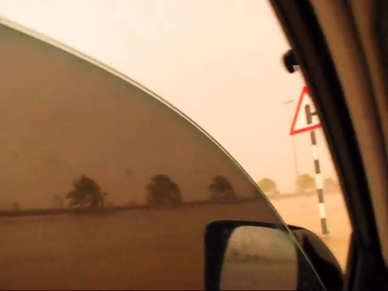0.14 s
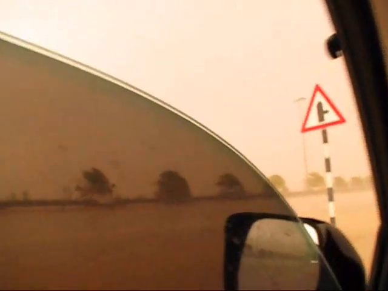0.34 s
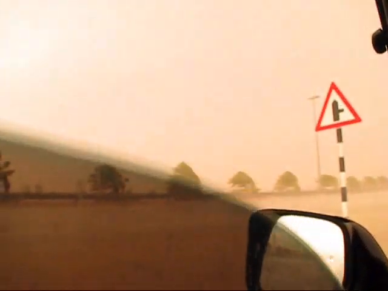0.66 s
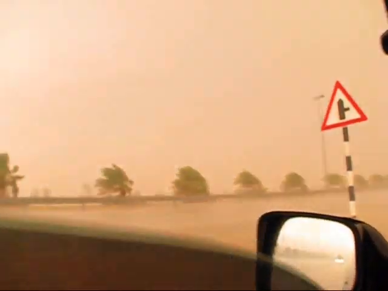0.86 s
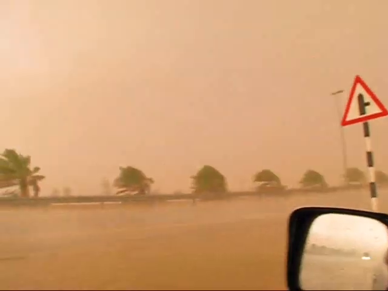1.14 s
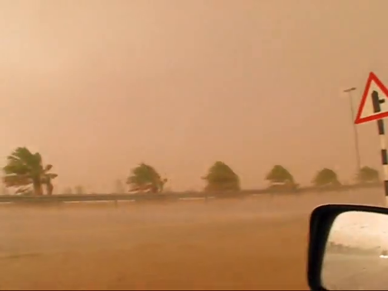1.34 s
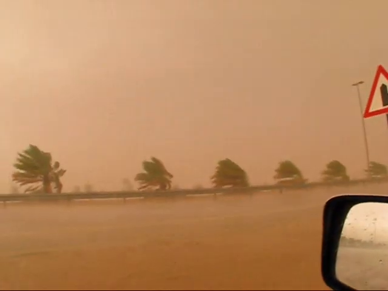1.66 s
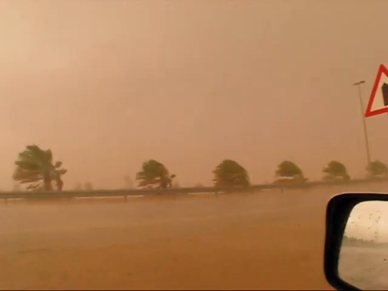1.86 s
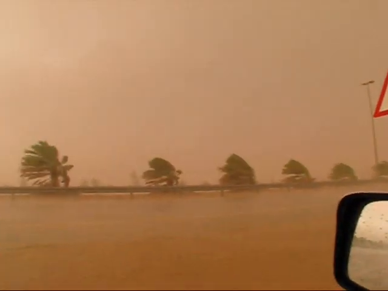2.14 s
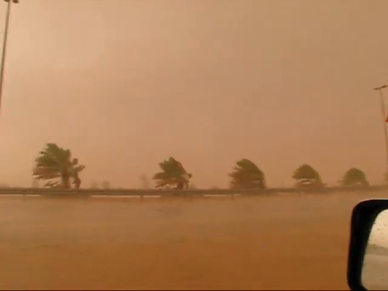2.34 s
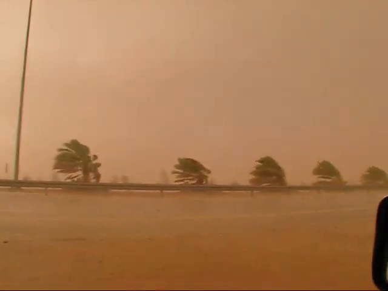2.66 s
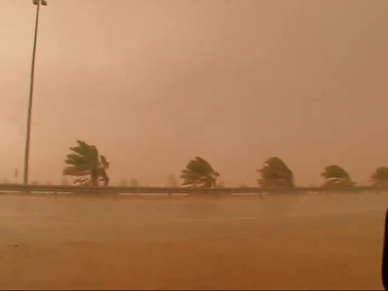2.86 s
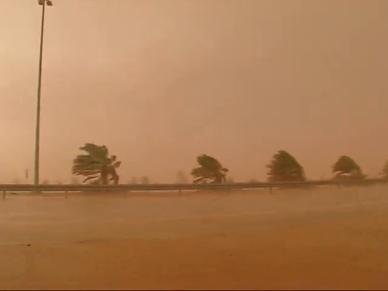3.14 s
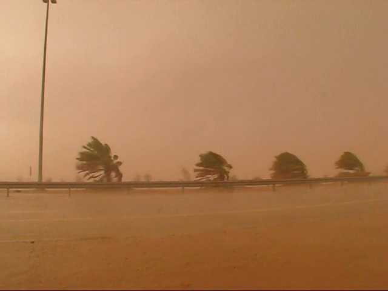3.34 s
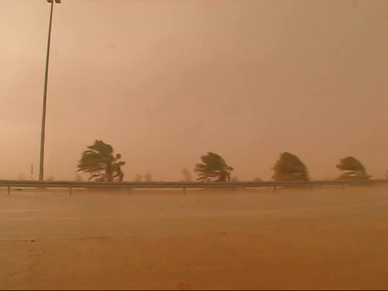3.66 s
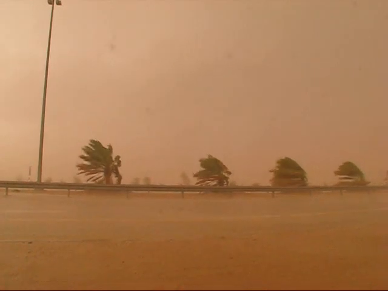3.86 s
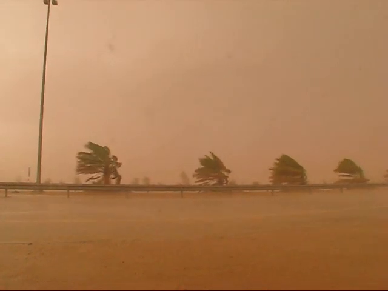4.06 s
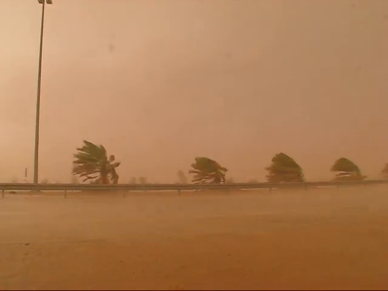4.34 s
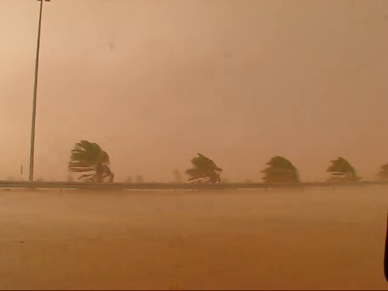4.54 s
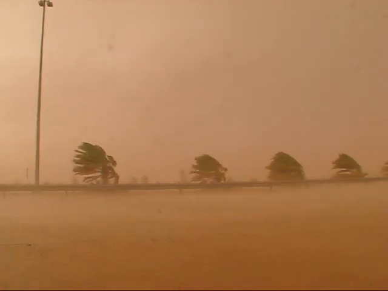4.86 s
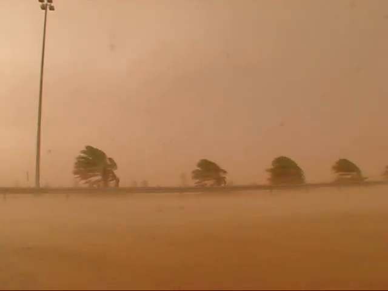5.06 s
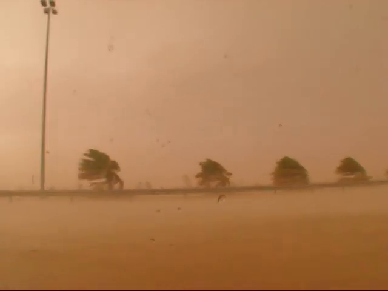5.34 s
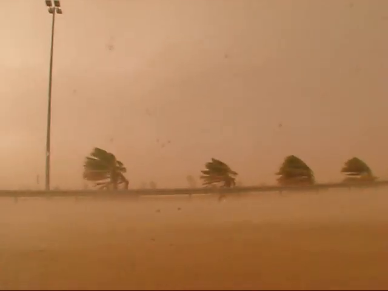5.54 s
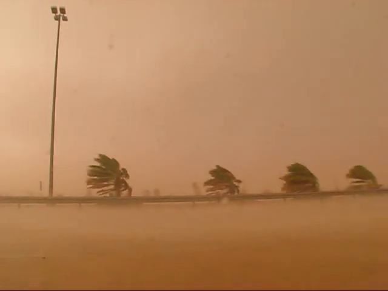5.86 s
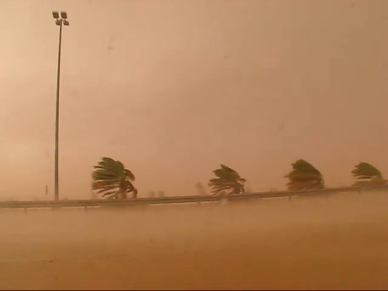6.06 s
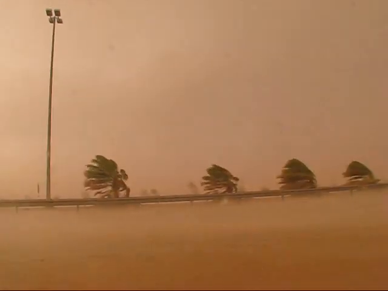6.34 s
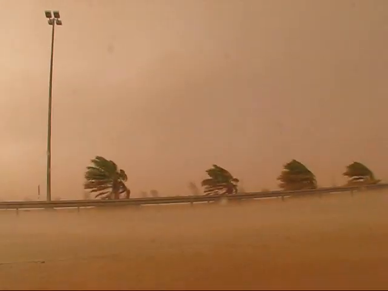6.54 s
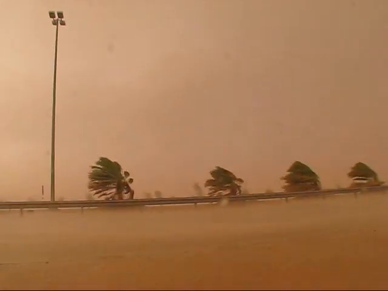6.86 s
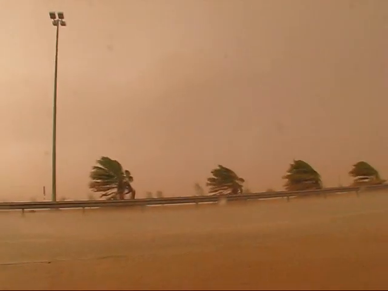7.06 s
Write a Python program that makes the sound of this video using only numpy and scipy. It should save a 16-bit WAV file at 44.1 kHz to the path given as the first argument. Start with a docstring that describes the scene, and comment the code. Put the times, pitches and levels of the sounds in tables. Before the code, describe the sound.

A gale roars and heavy rain rushes across a desert road, heard from a stereo microphone at a car's side window. Slightly muffled at first, the storm grows louder and brighter as the window opens. Gusts thump, knock and crack on the microphone, mostly on the left, over a low cabin rumble and occasional ticking drops. After the hardest blows the storm dips and swells back, then eases toward the end.

```python
"""A desert road in a storm of rain and sand, from a camera's stereo microphone at a car's open side window.
Outside, the gale roars, sheets of rain rush past and spray hisses, brighter once the glass has sunk.
The window edge whistles and the draught shakes the cabin. Up close, single drops tick and eddies thump,
knock and crack on the microphone ports. Each hard thump makes the gain control duck,
so the storm sinks at once and then swells back."""
import sys
import numpy as np
from scipy import signal
from scipy.fft import rfft, irfft, next_fast_len
from scipy.io import wavfile
from scipy.ndimage import uniform_filter1d, minimum_filter1d, map_coordinates

SR = 44100
rng = np.random.default_rng(int(sys.argv[2]) if len(sys.argv) > 2 else 0)


def materialize(psi):
    """Save the field psi as 16-bit PCM at rate SR to the path in sys.argv[1].

    A 1-D psi becomes a single channel; in a 2-D psi each row is a channel.
    """
    bounded = np.clip(np.atleast_2d(psi).T, -1, 1)
    quanta = np.round(bounded * 32767).astype(np.int16)
    wavfile.write(sys.argv[1], SR, quanta)


N = 317520
TIME = np.arange(N) / SR

# Spectral shapes at the microphone: frequency_hz, relative_db
GALE_SPECTRUM = [(15, -35), (25, -7), (115, -5.5), (158, -2), (264, -3), (318, -4.5), (383, -3),
                 (879, -6.5), (1090, -6), (1240, -7), (1500, -5), (2560, -6), (4380, -8.5), (9000, -15),
                 (12800, -17), (15000, -37.5)]  # wind, rain and spray outside
SHEET_SPECTRUM = [(200, -31), (600, 13), (2000, 10), (3500, 8), (7000, -13), (14000, -33)]  # one passing sheet of rain
RUMBLE_SPECTRUM = [(10, -22), (27, 3), (45, -2), (70, -10), (110, -18), (600, -34), (2000, -65)]  # the shaking cabin
SPLASH_SPECTRUM = [(300, -18), (2500, -1), (6000, -1), (11000, -0.5), (13000, 0), (15000, -26)]  # a drop close by
EDDY_SPECTRUM = [(20, -25), (70, 2), (170, 2.5), (450, -2), (800, -7.5), (1400, -21), (3000, -27.5),
                 (7000, -48), (14000, -67)]  # pressure on a port
CRACKLE_SPECTRUM = [(200, -2), (900, 10), (2000, -1), (5000, -8), (12000, -71)]  # an eddy's crest tearing
CRACK_SPECTRUM = [(300, -16), (1000, 1), (2500, -2.5), (6000, -13), (9000, -28), (14000, -44)]  # flow breaking from a port
# How alike left and right sound: near mono in the bass, wide in the mids,
STEREO_LIKENESS = [(60, .99), (160, .98), (330, .96), (700, .88), (1160, .72), (1800, .48), (2700, .12),
                   (3700, .14), (4400, .8), (8000, .79), (14000, .83)]
# Which way the sound leans: frequency_hz, left_minus_right_db
STEREO_LEAN = [(60, 3.5), (110, 1.5), (200, 0.5), (380, 0.5), (690, 0), (1280, 0.5), (2360, -2.5),
               (4340, -0.5), (8010, 0.5), (14800, -0.5)]
# Strength of the storm, as the level of its rushing rain: time_s, level_db
STORM_STRENGTH = [(0, -25), (.45, -26), (.7, -24), (1.0, -22), (1.25, -18.5), (1.55, -20.5), (1.7, -18.5),
                  (2.2, -20.5), (2.6, -19.5), (2.9, -19), (3.1, -23.5), (3.35, -22), (3.65, -22),
                  (4.0, -22.5), (4.35, -22), (4.65, -20), (4.85, -19), (5.25, -23), (5.7, -25), (6.0, -26),
                  (6.3, -26.5), (6.55, -28), (6.7, -26.8), (6.85, -27.6), (7.2, -28)]
# Dull thuds in the car body: centre_s, length_s, level_db
BODY_THUDS = [(0.057, 0.09, -30), (0.22, 0.091, -30)]
# Gusts passing the window frame: centre_s, length_s, pitch_hz, glide_octaves_per_s, level_db
FRAME_GUSTS = [(0.4, 0.2, 678, 0, -31), (5.826, 0.1, 2026, -5.5, -28), (6.879, 0.4, 1190, 0.4, -35.5),
               (7.14, 0.24, 2084, 1, -38)]
# Sheets of rain just outside the window: centre_s, length_s, rush_db, spray_db
RAIN_SHEETS = [(0.39, 0.15, -25, -58), (0.68, 0.27, -40, -38), (1.224, 0.18, -35, -25),
               (2.637, 0.38, -28, -32), (2.878, 0.093, -30, -30), (4.3, 0.4, -40, -29.5),
               (5.34, 0.32, -28.5, -31.5), (5.79, 0.13, -28, -29)]
# Drops landing beside the microphone: start_s, level_db
NEAR_DROPS = [(0.498, -34), (1.349, -17), (2.417, -16), (2.894, -17), (3.652, -17), (3.7195, -18),
              (4.109, -16), (4.733, -7), (5.473, -17), (5.511, -14), (6.549, -18), (6.97, -24)]
# Eddies tearing across the ports: centre_s, level_db
PORT_CRACKS = [(1.979, -7), (3.015, -11.5), (4.973, -2), (4.98, -1), (4.9853, -0.5), (5.206, -16),
               (5.85, -14.5), (6.42, -11), (6.755, -16.5)]
# Eddies slamming a port: start_s, start_pitch_hz, level_db, left_minus_right_db
PORT_KNOCKS = [(1.757, 260, -3.5, 12), (1.828, 420, 6, 18), (1.9395, 330, 9, 15), (3.0125, 300, -2.5, 16),
               (3.829, 278, -2, 6), (3.836, 435, 2.5, 4), (4.6805, 640, 10, 16), (4.928, 500, 8.5, 16),
               (4.9503, 520, 5.5, 3), (4.973, 340, 9, 10), (4.9835, 420, 8, 6), (4.9922, 600, 7, -3),
               (5.6112, 220, 0.5, 20), (5.848, 369, 0, 10), (5.877, 280, -2, 17), (6.411, 280, 1, 19),
               (6.4195, 680, 3, 22), (6.448, 340, -1, -3), (6.7517, 357, -2.5, 9)]
# Eddies striking the ports: centre_s, length_s, peak_db, left_minus_right_db, extra_bass_db
PORT_EDDIES = [(0.613, 0.056, -14, 10, 5), (1.42, 0.064, -10, 4, 7), (1.76, 0.031, -2, 8, 9),
               (1.838, 0.029, 5, 12, 7), (1.885, 0.022, 8, 12, 6), (1.952, 0.032, 11.5, 8, 0),
               (1.977, 0.056, 14, 0.5, -2), (1.999, 0.028, 1, 10, 1), (2.038, 0.04, 3, -17, -5),
               (2.115, 0.025, -5.5, 14, 0), (2.182, 0.07, -14, 4, 12), (2.25, 0.062, -4, 12, 7),
               (2.39, 0.13, -10, 2.5, -1), (2.554, 0.056, -6, 7, 0), (2.901, 0.053, -8.5, 5, 2),
               (3.017, 0.035, -2.5, 12, 3), (3.221, 0.068, -10.5, 14, 3), (3.842, 0.054, 2.5, 0, 3),
               (3.916, 0.019, -4.5, -10, -5), (3.99, 0.027, -7, 14, -5), (4.108, 0.079, -9, 7, 9),
               (4.39, 0.048, -4, 23.5, 5), (4.558, 0.056, -17, 11, 8), (4.693, 0.018, 8.5, 0.5, -14),
               (4.743, 0.064, -6, 9, 7), (4.893, 0.018, -0.5, 7, 2), (4.933, 0.014, 8.5, 10, -2),
               (4.963, 0.016, 6, 4, 5), (4.981, 0.03, 10, 8, -6), (4.998, 0.014, 4, -11, -2),
               (5.201, 0.045, 1.5, 17, 2), (5.618, 0.016, -3.5, 20, 13), (5.636, 0.035, -8, 17, 3),
               (5.782, 0.018, -9, 1, 4), (5.85, 0.044, -1, 10, 0), (5.876, 0.018, -10, 12, 7.5),
               (5.981, 0.036, -11, 15, 21), (6.13, 0.13, -25, 11, 8), (6.269, 0.04, -8.5, 12, 6),
               (6.407, 0.029, -1, 18, 4), (6.437, 0.032, 0.5, 7, -9), (6.511, 0.047, -9.5, 8, -16),
               (6.732, 0.048, -7.5, 19, 16), (6.755, 0.029, -2, 18, 3), (6.844, 0.038, -10, 18, -2),
               (7.125, 0.09, -17.5, 4, 13)]

STORM_MEAN_DB, ROAR_DB, HISS_DB = -22, -25, -29  # rain, wind and spray at mean strength
ROAR_GROWTH, HISS_GROWTH = 0.67, 1  # dB gained per dB of storm strength
WINDOW_SINKS_S, WINDOW_DOWN_S = 0.17, 1
GLASS_ROAR_DB, GLASS_RUSH_DB, GLASS_HISS_DB = -3.5, -2.8, -4.5  # shielding by the raised glass
GLASS_EDGE_HZ = 5000  # the glass dulls the rush above this
KNOCK_RISE_S, KNOCK_T60_S = 0.00059, 0.04
KNOCK_SAG, KNOCK_SAG_S = 0.47, 0.012  # share of pitch lost as the eddy slows, and how soon


def amp(db):
    """Decibels to gain."""
    return 10 ** (np.asarray(db) / 20)


def unit(x):
    """x at rms 1."""
    return x / np.sqrt(np.mean(x ** 2) + 1e-20)


def unit_peak(pair):
    """Each channel at peak 1."""
    return pair / np.abs(pair).max(axis=1, keepdims=True)


def along(points, hz):
    """(Hz, value) points read on a log axis."""
    points_hz, values = np.transpose(points)
    return np.interp(np.log(hz + 1), np.log(points_hz + 1), values)


def bell(centre_s, length_s):
    """A smooth swell and fade of height 1."""
    return 1 / (1 + (2 * (TIME - centre_s) / length_s) ** 2) ** 2


def wobble(rate):
    """A smooth random curve, rate knots a second."""
    return map_coordinates(rng.standard_normal(int(N * rate / SR) + 4), [TIME * rate])


def below(x, edge, order=6):
    """A soft step from 1 under the edge to 0 above it."""
    return 1 / (1 + (x / edge) ** order)


def filtered(x, response):
    """x times a response of frequency."""
    size = next_fast_len(N + SR // 4)
    return irfft(rfft(x, size) * response(np.fft.rfftfreq(size, 1 / SR)), size)[..., :N]


def coloured(x, spectrum):
    """x shaped by (Hz, dB) points, at rms 1."""
    return unit(filtered(x, lambda hz: amp(along(spectrum, hz))))


def resonance(centre_hz, width_hz):
    """Noise of rms 1 ringing in one resonance."""
    return unit(filtered(rng.standard_normal(N), lambda hz: 1 / (1 + ((hz - centre_hz) / width_hz) ** 2)))


def turbulence(patchy_db):
    """Two noises whose loudness drifts in patches of time and frequency."""
    spectra = signal.stft(rng.standard_normal((2, N)), nperseg=512)[2]
    patches = uniform_filter1d(rng.standard_normal(spectra.shape[1:]), size=7, axis=0)
    patches = unit(uniform_filter1d(patches, size=14, axis=1))
    return unit(signal.istft(spectra * amp(patchy_db * patches), nperseg=512)[1][:, :N])


def patter(rate, spread_db):
    """Two streams of tiny impacts of varying size, rate a second."""
    hits = (rng.random((2, N)) < rate / SR) * rng.choice([-1, 1], (2, N))
    return unit(hits * amp(spread_db * rng.standard_normal((2, N)).clip(-2, 2)))


def stereo_band(pair, power_share):
    """One band of the gale's spectrum, spread over left and right."""
    def mid_side(hz):
        angle = np.arccos(np.clip(along(STEREO_LIKENESS, hz), -1, 1)) / 2
        return amp(along(GALE_SPECTRUM, hz)) * np.sqrt(power_share(hz)) * [np.cos(angle), np.sin(angle)]
    mid, side = filtered(pair, mid_side)
    left_right = np.array([mid + side, mid - side])
    return unit(filtered(left_right, lambda hz: amp(np.outer([.5, -.5], along(STEREO_LEAN, hz)))))


def port_shadow(lean_db):
    """Left and right gains: the port that an eddy meets second gets less."""
    return amp(np.minimum([[lean_db], [-lean_db]], 0))


def wakes(relative_db=-33.5, lag_s=0.02, length_s=0.27):
    """Strength of the churned air that trails the eddies."""
    return np.sqrt(sum((amp(peak_db + relative_db) * bell(centre_s + lag_s, length_s)) ** 2
                       for centre_s, _, peak_db, *_ in PORT_EDDIES))


def draught(steady_db=-39):
    """Strength of the air tumbling in: steady, and stronger in the wake of each eddy."""
    return np.hypot(amp(steady_db), wakes())


def cabin_boom(relative_db=-4.5):
    """The draught makes the cabin air boom hollowly around the microphone."""
    return draught() * amp(relative_db) * resonance(centre_hz=159.0, width_hz=26)


def rumble(relative_db=-5.5, flutter_db=2.0):
    """The draught shakes the whole cabin in slow lumps; the wakes flutter at each port on its own."""
    lumps = unit(amp(2.6 * wobble(14)) * coloured(rng.standard_normal(N), RUMBLE_SPECTRUM))
    flutter = amp(flutter_db * np.array([wobble(28), wobble(28)]).clip(-2, 1.7))
    flaps = unit(flutter * coloured(rng.standard_normal((2, N)), EDDY_SPECTRUM))
    return draught() * amp(relative_db) * lumps + wakes() * flaps * amp([[1.5], [-3.5]])


def body_thuds():
    """The car body thuds softly twice as the window starts to sink."""
    envelope = sum(amp(db) * bell(centre_s, length_s) for centre_s, length_s, db in BODY_THUDS)
    return envelope * resonance(centre_hz=116, width_hz=110)


def edge_whistle(centre_s=3.5, length_s=0.49, level_db=-34):
    """The window edge gives a breathy whistle while the wind meets it squarely."""
    envelope = amp(level_db) * below(np.abs(TIME - centre_s), length_s / 2)
    return envelope * resonance(centre_hz=1058, width_hz=15)


def frame_gusts(width_share=0.19):
    """Each gust whooshes past the window frame in a broad resonance that glides with the air's speed."""
    out = np.zeros((2, N))
    for centre_s, length_s, pitch_hz, glide, db in FRAME_GUSTS:
        gliding_hz = pitch_hz * 2 ** (glide * np.clip(TIME - centre_s, -length_s, length_s))
        phase = 2 * np.pi * np.cumsum(gliding_hz) / SR
        noise = rng.standard_normal((2, 2, N)) + rng.standard_normal((2, 1, N))
        flow = filtered(noise, lambda hz: below(hz, width_share * pitch_hz, order=3))
        whoosh = unit(flow[0] * np.cos(phase) + flow[1] * np.sin(phase))
        out += amp(db) * bell(centre_s, length_s) * whoosh
    return out


def rain_sheets(spray_hz=5600):
    """Single sheets of rain swell and fade just outside the window, each with its fine spray."""
    rush_swell = sum(amp(db) * bell(centre_s, length_s) for centre_s, length_s, db, _ in RAIN_SHEETS)
    spray_swell = sum(amp(db) * bell(centre_s, length_s) for centre_s, length_s, _, db in RAIN_SHEETS)
    rush = coloured(rng.standard_normal((2, N)) + 1.4 * rng.standard_normal(N), SHEET_SPECTRUM)
    spray = stereo_band(rng.standard_normal((2, N)), lambda hz: 1 - below(hz, spray_hz))
    return rush_swell * rush + spray_swell * spray


def storm(low_hz=1050, high_hz=6500):
    """Out on the road one strength drives all: wind roars below, rain rushes above, spray hisses on top."""
    strength_db = np.interp(TIME, *np.transpose(STORM_STRENGTH))
    gust_db = strength_db - STORM_MEAN_DB
    shut = np.interp(TIME, [WINDOW_SINKS_S, WINDOW_DOWN_S], [1, 0])
    flurry = wobble(13)  # rain and spray come in the same quick sheets
    roar = stereo_band(turbulence(patchy_db=1.0), lambda hz: below(hz, low_hz))
    rain = turbulence(patchy_db=0.38) + 0.25 * patter(rate=2500, spread_db=2.5)
    rush = stereo_band(rain, lambda hz: below(hz, high_hz) * (1 - below(hz, low_hz)))
    rush += shut * (amp(GLASS_RUSH_DB) - 1) * filtered(rush, lambda hz: 1 - below(hz, GLASS_EDGE_HZ))
    spray = turbulence(patchy_db=1.6) + 0.49 * patter(rate=1500, spread_db=8.5)
    hiss = stereo_band(spray, lambda hz: 1 - below(hz, high_hz))
    return (roar * amp(ROAR_DB + ROAR_GROWTH * gust_db + GLASS_ROAR_DB * shut + 0.38 * wobble(20))
            + rush * amp(strength_db + 0.5 * flurry)
            + hiss * amp(HISS_DB + HISS_GROWTH * gust_db + GLASS_HISS_DB * shut + 0.7 * flurry))


def near_drops(t60_s=0.028):
    """A drop beside the microphone bursts into a few milliseconds of bright spray."""
    envelope = np.zeros(N + SR)
    t = np.arange(SR // 20) / SR
    for start_s, db in NEAR_DROPS:
        envelope[round(start_s * SR):][:len(t)] += amp(db - 60 * t / t60_s)
    return envelope[:N] * coloured(rng.standard_normal(N), SPLASH_SPECTRUM)


def port_cracks(length_s=0.0023):
    """The flow breaks away from the microphone ports in a few very short cracks."""
    envelope = sum(amp(db) * bell(centre_s, length_s) for centre_s, db in PORT_CRACKS)
    return envelope * coloured(rng.standard_normal((2, N)), CRACK_SPECTRUM) * amp([[1.5], [-1.5]])


def port_knocks(roughness=0.27, push_db=-7.0):
    """The air in a slammed port rings for a few uneven cycles over a duller push, and sags in pitch."""
    out = np.zeros((2, N))
    t = np.arange(SR // 12) / SR
    envelope = (1 - np.exp(-t / KNOCK_RISE_S)) * amp(-60 * t / KNOCK_T60_S)
    sag = 1 - KNOCK_SAG * (1 - np.exp(-t / KNOCK_SAG_S))
    flutter = 1 + roughness * np.array([wobble(700), wobble(700)])  # each port on its own
    for start_s, pitch_hz, db, lean_db in PORT_KNOCKS:
        span = slice(round(start_s * SR), round(start_s * SR) + len(t))
        phase = 2 * np.pi * np.cumsum(pitch_hz * sag * flutter[:, span], axis=1) / SR
        ring = np.sin(phase) + amp(push_db) * np.sin(0.43 * phase)
        out[:, span] += ring * envelope * amp(db) * port_shadow(lean_db)
    return out


def port_eddies(bass_hz=151, rise_share=0.22, fall_share=0.33, tearing=0.11, drive=0.71):
    """Right on the microphone, each eddy is a steep, flapping burst of pressure."""
    swirl = rng.standard_normal((2, N)) + 0.36 * rng.standard_normal(N)  # partly common to both ports
    pressure = coloured(swirl * amp(2.64 * wobble(260)), EDDY_SPECTRUM)
    crackle = coloured(rng.standard_normal((2, N)), CRACKLE_SPECTRUM)
    bass = filtered(pressure, lambda hz: below(hz, bass_hz, order=4))
    out = np.zeros((2, N))
    for centre_s, length_s, peak_db, lean_db, bass_db in PORT_EDDIES:
        span = slice(max(0, int((centre_s - 2 * length_s) * SR)), int((centre_s + 2 * length_s) * SR))
        age = (TIME[span] - centre_s) / length_s
        from_peak = np.where(age < 0, (age / rise_share) ** 2, age / fall_share)
        push = pressure[:, span] + (amp(bass_db) - 1) * bass[:, span]  # broad eddies carry more bass
        burst = unit_peak(push / (1 + from_peak ** 3))
        burst = unit_peak(np.tanh(drive * burst))  # the port rounds off the highest crests
        # the hardest crests tear into fine turbulence, which grows as the square of the pressure
        torn = unit_peak(burst + tearing * amp(peak_db) * burst ** 2 * crackle[:, span])
        out[:, span] += torn * amp(peak_db) * port_shadow(lean_db)
    return out


def scene():
    """The storm outside, the car around the camera, and the air and water at its microphone."""
    outside = storm() + rain_sheets() + frame_gusts()
    car = edge_whistle() + cabin_boom() + body_thuds() + rumble()
    close = port_eddies() + port_knocks() + port_cracks() + near_drops()
    return outside + car + close


def gain_control(x, ceiling_db=-3.0, recovery_db_per_s=15.0):
    """Peaks over the ceiling turn both channels down at once; the gain then climbs steadily back."""
    peak = uniform_filter1d(np.abs(x).max(axis=0), size=9)
    excess_db = np.maximum(20 * np.log10(np.abs(peak) + 1e-9) - ceiling_db, 0)
    climb_db = recovery_db_per_s * TIME
    cut_db = np.maximum.accumulate(excess_db + climb_db) - climb_db
    gain_db = uniform_filter1d(minimum_filter1d(-cut_db, size=129), size=129)
    return x * amp(gain_db)


def record(dry):
    """The camera rides its gain and keeps nothing above its band limit."""
    return filtered(gain_control(dry), lambda hz: hz < 15200)


dry = scene()
out = record(dry)
materialize(out)
```